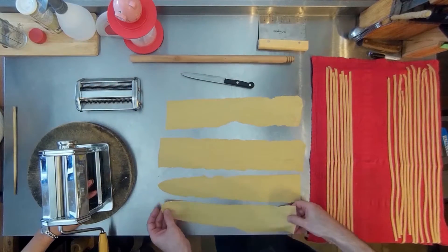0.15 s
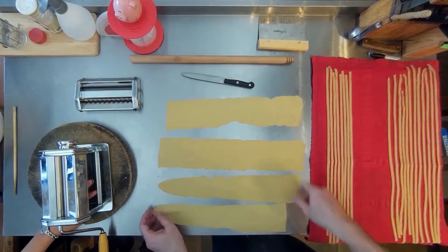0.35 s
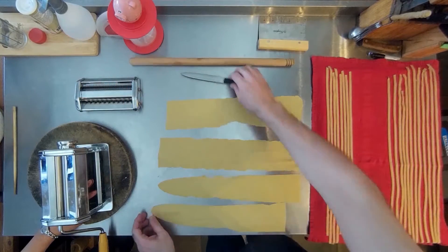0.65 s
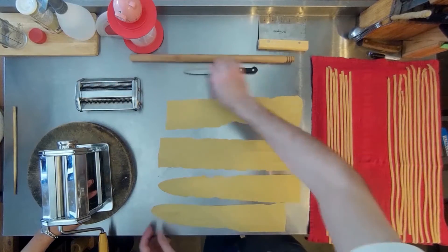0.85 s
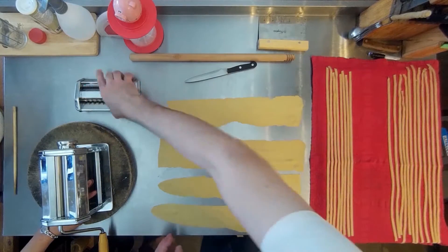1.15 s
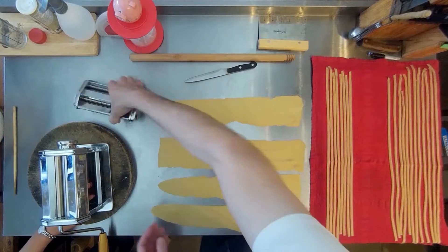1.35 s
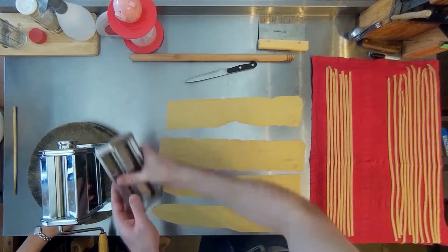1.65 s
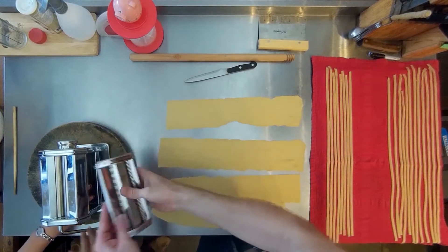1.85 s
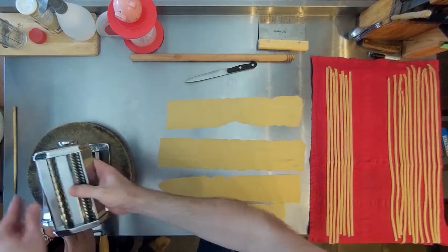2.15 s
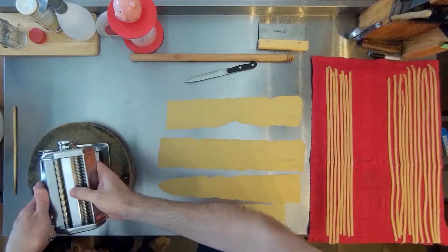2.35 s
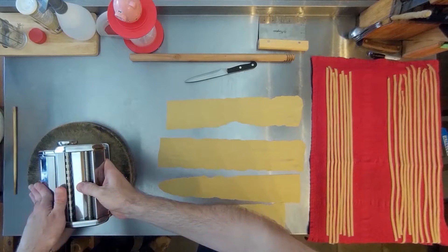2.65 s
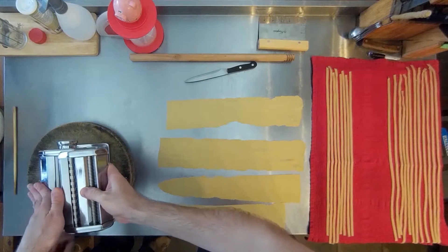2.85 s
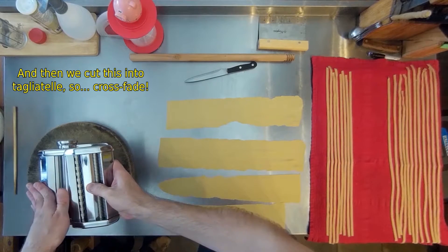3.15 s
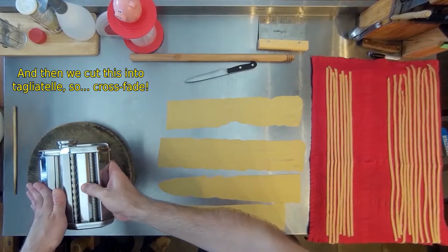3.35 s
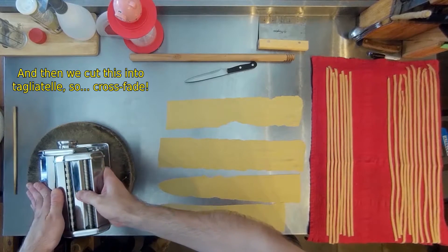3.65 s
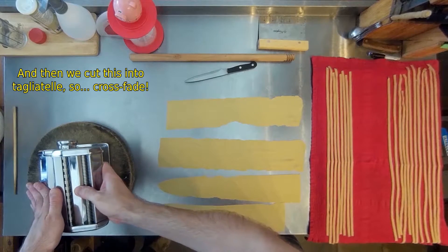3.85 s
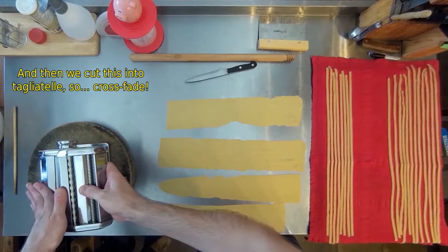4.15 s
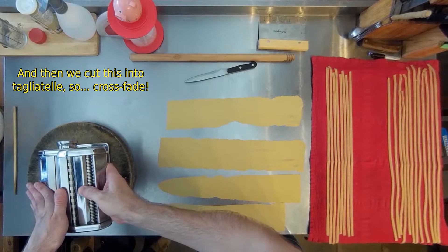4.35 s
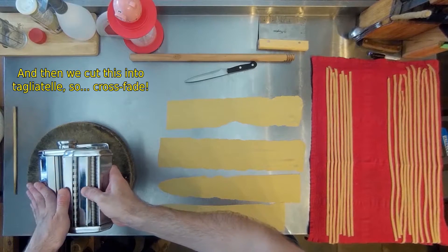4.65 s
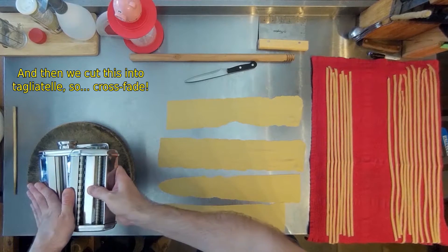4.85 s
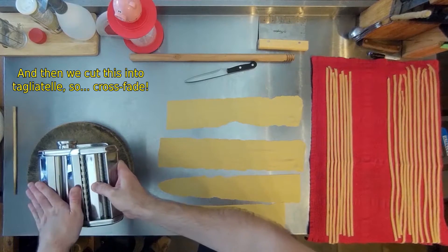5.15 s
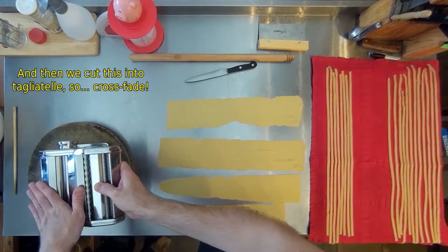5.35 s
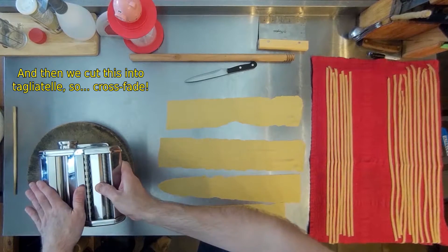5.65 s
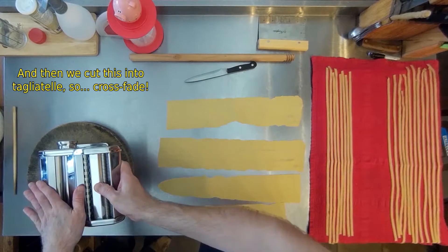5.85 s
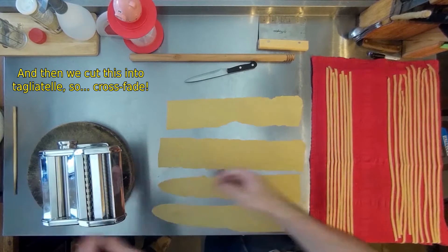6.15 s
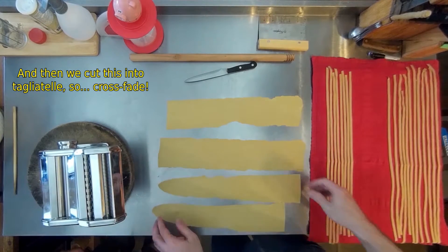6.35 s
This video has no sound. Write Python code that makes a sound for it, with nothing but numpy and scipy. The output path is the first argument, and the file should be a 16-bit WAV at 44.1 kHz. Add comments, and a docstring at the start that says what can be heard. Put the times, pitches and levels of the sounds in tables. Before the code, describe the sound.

A faint, steady low background fills a reflective kitchen. At 0.45 s there is a barely audible hand pat. Around 0.95 s a loose steel cutter clinks twice on the metal worktop, with a thin lingering ring and slight scrape; at 1.3 s a hollow sheet-metal thud follows. Tiny tinkles sound from 1.4 to 2.2 s as it is carried. At 2.3 s it scrapes against the pasta machine, then hard knocks hit at 2.6 and 2.75 s. From 2.9 to 3.25 s and 3.6 to 4.35 s come dense, short-damped clanks, rattles and grinding, with the table rumbling beneath. It eases; a quiet mid-pitched creak swells from 4.5 s and stops near 5 s amid small clicks. Knocks and scraping return at 5.25-5.5 s, a light tinkle at 5.6 s, then two loud, dry hand slaps at 5.8 and 6.05 s, leaving brief echo and background.

```python
"""In a hard-walled kitchen, a steel cutter head is nudged on a metal worktop, picked up and worked onto
the frame of a hand-cranked pasta machine. Parts knock, grind and tinkle, hands slap, the worktop shakes, a creak
swells; the room echoes the blows over a faint steady background. Micro-impact bursts and friction noise drive
banks of damped sines; slaps, shaking, echoes and background are shaped noise.
"""
import sys
import numpy as np
from scipy import signal
from scipy.fft import rfft, irfft
from scipy.io import wavfile
from scipy.ndimage import uniform_filter1d

SR = 44100
rng = np.random.default_rng(int(sys.argv[2]) if len(sys.argv) > 2 else 0)


def store_pcm(level_fs):
    """Save levels as 16-bit WAV."""
    pcm = np.round(np.clip(level_fs, -1, 1) * 32767).astype(np.int16)
    wavfile.write(sys.argv[1], SR, np.atleast_2d(pcm).T)


N = 286650   # samples
CURVE_STEP = 32   # samples per point of a coarse curve


def from_db(db):
    """Decibels to amplitude gain."""
    return 10 ** (np.asarray(db) / 20)


def rms_one(x):
    """Scale to rms 1."""
    return x / np.sqrt(np.mean(x ** 2) + 1e-20)


def at_hz(points, hz, column=1):
    """Read a table column, linear in log frequency."""
    points = np.array(points)
    return np.interp(np.log(hz), np.log(points[:, 0]), points[:, column])


def coloured(spectrum):
    """Gaussian noise filtered to the given spectrum, rms 1."""
    hz = np.maximum(np.arange(N // 2 + 1) * SR / N, 1)
    white = rfft(rng.standard_normal(N))
    return rms_one(irfft(white * from_db(at_hz(spectrum, hz)), N))


def swells(start_s, rise_s, peak_db, rise_db, fade_s):
    """One coarse gain curve per event: sets in, climbs to its peak, fades evenly in dB (fade_s per 20 dB)."""
    past_peak_s = np.arange(0, N, CURVE_STEP) / SR - (start_s + rise_s)[:, None]
    rise_s, fade_s = (np.maximum(v + 0 * start_s, .002)[:, None] for v in (rise_s, fade_s))
    climb_db = rise_db * past_peak_s / rise_s
    fall_db = -20 * past_peak_s / fade_s
    db = peak_db[:, None] + np.minimum(climb_db, fall_db)
    return from_db(db) * (past_peak_s > -rise_s)


def full_rate(curve):
    """Smooth a coarse curve and interpolate it to every sample."""
    smooth = uniform_filter1d(curve, size=9)
    return np.interp(np.arange(N) / CURVE_STEP, np.arange(len(curve)), smooth)


RISE_MS = 1.2   # slope of the contact's onset, which starts at a quarter of full height


def chatter(length_ms):
    """A contact is a dying flurry of micro-impacts that drives all pitches about equally; unit energy."""
    t_ms = np.arange(2048) * 1000 / SR
    fall = np.exp(-t_ms / np.clip(length_ms, .2, 20)[:, None])
    flurry = rng.standard_normal(fall.shape) * fall
    flurry *= np.minimum(t_ms / RISE_MS + .25, 1)
    for _ in range(3):   # flatten the spectrum, then restore some of the decay
        spectrum = rfft(flurry)
        flat = irfft(spectrum / (np.abs(spectrum) + 1e-9))
        flurry = flat * fall ** 0.22
    return flurry / np.sqrt(np.sum(flurry ** 2, axis=1, keepdims=True))


def ring(x, hz, t60_s):
    """Two-pole resonator: a unit click starts a damped sine of about unit height."""
    r = from_db(-60 / (t60_s * SR))
    w = 2 * np.pi * hz / SR
    return signal.lfilter([0, np.sin(w)], [1, -2 * r * np.cos(w), r * r], x + 1e-18)


LOW_RING_HZ = 1340   # low_db acts on modes below this


def strike(t_s, level_db, tilt_db, length_ms, modes, pivot_hz, trim_db, spread_db,
           low_db=0, rub=0, rub_tilt_db=0):
    """Each blow drives every mode with its own random strength; rubbing drives them continuously."""
    luck = rng.standard_normal((len(t_s), len(modes)))
    contact = chatter(length_ms)
    at = np.round(t_s * SR).astype(int)[:, None] + np.arange(contact.shape[1])
    out = np.zeros(N)
    for k, (hz, mode_db, t60_s) in enumerate(modes):
        octaves = max(np.log2(hz / pivot_hz), 0)   # brightness acts above the pivot only
        blow_db = level_db + trim_db + tilt_db * octaves
        blow_db = blow_db + low_db * (hz < LOW_RING_HZ) + spread_db * luck[:, k]
        pulses = from_db(blow_db)[:, None] * contact
        drive = np.bincount(at.ravel(), pulses.ravel(), N)
        drive = drive + rub * from_db(rub_tilt_db * octaves)
        out += (-1) ** k * from_db(mode_db) * ring(drive, hz, t60_s)
    return out


# background spectrum: f/Hz, relative level/dB per Hz
BACKGROUND_SPECTRUM = [(9.4, -32), (16, 3.5), (64, -7), (574, -7.5), (1170, -17.5), (1450, -15.5),
                       (1580, -17.5), (2310, -22), (6360, -29), (9070, -39), (11000, -59), (14300, -83),
                       (22000, -120)]
BACKGROUND_RMS_DB = -61


def background():
    """Steady coloured noise."""
    return from_db(BACKGROUND_RMS_DB) * coloured(BACKGROUND_SPECTRUM)


# hands pat or slap dough, worktop and frame: t/s, level/dB, centre f/Hz, width/octaves
SLAPS = [(.45, -43.5, 1470, 2.5), (1.54, -46, 2500, 3), (5.606, -39.5, 3480, 1.8), (5.815, -16, 2000, 1.81),
         (6.048, -14, 1500, 1.47)]
SLAP_MS, RUSTLE_DB, RUSTLE_T60_S = 1.6, -11.5, 0.23   # rustle rms re clack peak, before the band filter


def slaps():
    """Ringless clack: a short flurry plus dying rustle noise through one broad band."""
    out = np.zeros(N + SR)
    contact = chatter(np.full(len(SLAPS), SLAP_MS))
    t = np.arange(SR // 2) / SR
    for (t_s, level_db, hz, octaves), flurry in zip(SLAPS, contact):
        clack = rng.standard_normal(len(t)) * from_db(RUSTLE_DB - 60 * t / RUSTLE_T60_S)
        clack[:len(flurry)] += flurry / np.abs(flurry).max()
        edges_hz = hz * 2 ** (np.array([-.5, .5]) * octaves)
        band = signal.butter(3, edges_hz, "band", fs=SR, output="sos")
        out[round(t_s * SR):][:len(t)] += from_db(level_db) * signal.sosfilt(band, clack)
    return out[:N]


# steel sliding on steel: start t/s, swell/s, peak force level/dB, fade/s per 20 dB, brightness/dB per octave
SLIDES = [(0.859, 0.066, -68.5, 0.2231, 7.5), (1.389, 0.0072, -76.5, 0.24, 4.5),
          (2.316, 0.028, -54.5, 0.1153, 2.5), (2.33, 0.039, -53.5, 0.07, 7.5),
          (2.5, 0.096, -73, 1.21, 10.5), (2.85, 0.15, -60, 0.21, 2), (3.259, 0.022, -72, 1.04, -1),
          (3.8, 0.013, -64, -0.02, 8), (4.9, 0.0044, -75.5, 0.19, 6), (5.223, 0.021, -60, 0.2428, 4.5),
          (5.255, 0.0067, -96, .5, 27), (5.49, 0.0089, -83.5, 1, 4)]
SLIDE_RISE_DB, GRAINS_PER_S = 15, 2500


def grinding():
    """Random signed friction grains scaled by slide force; the strongest slide sets brightness."""
    start_s, swell_s, peak_db, fade_s, tilt_db = np.transpose(SLIDES)
    force = swells(start_s, swell_s, peak_db, SLIDE_RISE_DB, fade_s)
    height = from_db(4.68 * np.minimum(rng.exponential(1, N), 4))
    grains = (rng.random(N) < GRAINS_PER_S / SR) * height * rng.choice([-1, 1], N)
    rub = rms_one(grains) * full_rate(force.sum(axis=0))
    return rub, full_rate(tilt_db[force.argmax(axis=0)])


# cutter against frame: t/s, level/dB, brightness/dB per octave, chatter/ms, low-ring level/dB
KNOCKS = [(2.352, -21, -6, 2.2, 4), (2.599, 0, 2.5, 1.8, 1), (2.695, -8, 3, 4.4, 4),
          (2.746, 1, -0.5, 3, -1.5), (2.76, -21, -16, 2.5, 3), (2.929, -18.5, -8, 2, -2),
          (2.985, -6, 1, 4.1, 3.5), (3.011, -4, -5.5, 3.1, 2), (3.023, -7.5, 1.5, 5.1, 2),
          (3.049, -12.5, -3, 2.3, 1.5), (3.059, -14.5, -6.5, 2.5, -3), (3.166, -26.5, 9, 24, 8.5),
          (3.181, -9.5, -2.5, 3.5, 0.5), (3.245, -9, 0, 5.5, -2.5), (3.5, -32.5, -6, 11, -1.5),
          (3.569, -20.5, 0, 14, -7), (3.59, -17, -0.5, 1.5, 3.5), (3.632, -3.5, -4.5, 3.3, 2),
          (3.648, -18.5, 2, 4, 1), (3.688, -6, 1, 3, 1), (3.718, -2, 0, 12, -2.5),
          (3.734, -15, -12, 2.4, 4.5), (3.774, -12, 0.5, 2.8, 0), (3.794, -1.5, 1.5, 4.8, -4.5),
          (3.932, -11, -1, 8.3, -3), (4.045, -13, -1, 5.1, 4.5), (4.097, -4.5, -1, 3.3, -3.5),
          (4.239, -6.5, -8.5, 7.7, -4.5), (4.321, -24, 0, 9.2, 1), (4.346, -12, -3, 11.6, 0.5),
          (4.408, -30, 2, 6, 6.5), (4.661, -26.5, -9, 8.9, -9), (4.817, -29, -1.5, 12, -1.5),
          (4.832, -18.5, -2, 13.3, -1), (4.878, -23, -3.5, 2.2, -8), (4.903, -19, -1.5, 1.5, -11),
          (4.979, -22.5, 6, 1.7, -1.5), (5.251, -7.5, -4, 4.6, -1.5), (5.273, -12.5, 3, 2.4, -2.5),
          (5.314, -16, -6, 3.2, -3), (5.467, -12, -0.5, 10, -4)]
# modes of frame and cutter together, hand-damped; shortest rows are dense clusters of panel modes:
# f/Hz, level/dB, t60/s
FRAME_MODES = [(337, -36.5, 0.037), (548, -21.5, 0.08), (588, -27, 0.062), (900.6, -10, 0.067),
               (955, -17.5, 0.035), (998, -4, 0.054), (1126, -5, 0.083), (1160, -3.5, 0.061),
               (1201.5, 3.5, 0.027), (1294, -3.5, 0.029), (1401, -4, 0.028), (1501, -8.5, 0.081),
               (1600, -3.5, 0.027), (1759, -1, 0.014), (1966, -7, 0.022), (2109, -9.5, 0.028),
               (2400, -3, 0.011), (2514, -16, 0.061), (2501, -8, 0.038), (2860, -2.5, 0.0076),
               (3040, -7.5, 0.019), (3330, -3.5, 0.0039), (3323, -21, 0.068), (3852, -15, 0.015),
               (4220, -7, 0.007), (4710, -24.5, 0.02), (5312, -29.5, 0.064), (5140, -4.5, 0.0018),
               (6150, -25, 0.033), (6200, -18, 0.004), (7190, -26.5, 0.013), (8770, -38, 0.017),
               (9560, -31.5, 0.00091)]


def machine():
    """Knocks and grinding grains ring the same frame."""
    *blows, low_db = np.transpose(KNOCKS)
    rub, rub_tilt_db = grinding()
    return strike(*blows, FRAME_MODES, pivot_hz=1290, trim_db=-9.0, spread_db=4.0,
                  low_db=low_db, rub=rub, rub_tilt_db=rub_tilt_db)


# free cutter struck on the worktop: t/s, level/dB, brightness/dB per octave, chatter/ms
BUMPS = [(0.9591, -9.5, 0, 1.37), (0.976, -9, -8.5, 0.84), (1.002, -20.5, 0, 1.2),
         (1.2742, -26.5, -21.5, 3.7)]
# modes of the free cutter; shortest rows are dense clusters: f/Hz, level/dB, t60/s
CUTTER_MODES = [(340, -19, 0.038), (990, -5.5, 0.049), (1420, -4.5, 0.013), (1770, -18, 0.15),
                (2325, 0, 0.003), (2793, 5.5, 0.039), (931, -12, .36), (2745, -20, .5), (2768, -17, .6),
                (2790, -17, .5), (3900, -22, .45), (3948, -22, .3), (5100, -36, .28), (6440, -39, .45),
                (7810, -49, .35), (8190, -49, .35), (9560, -51, .4), (3010, -12, 0.189),
                (3090, -17.5, 0.28), (3262, -11, 0.057), (3800, 1, 0.02), (3600, -27.5, 0.23),
                (5000, -18, 0.0065), (6900, -19, 0.023), (7800, -27, 0.0036)]


def cutter():
    """The loose cutter rings long when struck."""
    return strike(*np.transpose(BUMPS), CUTTER_MODES, pivot_hz=1650, trim_db=-1.0, spread_db=2)


# pushes of the hands that jolt the worktop: peak t/s, level/dB, extra level below the split/dB
JOLTS = [(1.148, -44.5, -12), (1.305, -27.5, -9), (2.337, -37, 8.5), (2.438, -50.5, 18), (2.612, -31, 3),
         (2.7, -36.5, 11), (2.756, -31, -9), (2.939, -44.5, 2), (3.007, -29, -11), (3.051, -33.5, -15),
         (3.185, -37.5, 6), (3.259, -33, -0.5), (3.371, -39, -2.5), (3.585, -33.5, -7), (3.64, -33.5, 4),
         (3.713, -32, 8), (3.749, -32.5, 0), (3.837, -32, 3.5), (3.94, -35.5, -16), (4.055, -39.5, -12),
         (4.105, -40.5, -9), (4.245, -47.5, -9.5), (4.357, -43.5, 11), (4.839, -48.5, 21), (4.91, -42.5, 5),
         (4.988, -46.5, 15.5), (5.273, -29.5, 7), (5.324, -31, 11.5), (5.41, -36.5, -5.5),
         (5.486, -33, 7.5)]
# worktop shaking spectrum: f/Hz, relative level/dB per Hz
WORKTOP_SPECTRUM = [(8.2, -31.5), (14, -4), (49, -8.5), (65, 7), (82, -15.5), (112, 3.5), (135, -4.5),
                    (195, 1), (234, 0), (270, -16.5), (316, -11), (354, -26), (402, -19), (420, -21),
                    (550, -43), (920, -120)]
JOLT_RISE_S, JOLT_RISE_DB, JOLT_FADE_S = 0.04, 31, 0.08   # fade per 20 dB
SPLIT_HZ = 64   # below: whole worktop sways; above: sheet shudders


def worktop_shaking():
    """Each push swells the same coloured noise, with its own balance of sway and shudder."""
    t_s, level_db, sway_db = np.transpose(JOLTS)
    shake = swells(t_s - JOLT_RISE_S, JOLT_RISE_S, level_db, JOLT_RISE_DB, JOLT_FADE_S)
    noise = coloured(WORKTOP_SPECTRUM)
    sway = signal.sosfiltfilt(signal.butter(2, SPLIT_HZ, fs=SR, output="sos"), noise)
    shudder = noise - sway
    return full_rate(shake.sum(axis=0)) * shudder + full_rate(from_db(sway_db) @ shake) * sway


# small touches, loose steel parts: t/s, level/dB, t60/s, pitch f/Hz, brightness/dB per octave
TINKLES = [ (1.274, -36.5, 0.15, 1765, -21), (1.415, -51, 0.069, 1416, -6.5),
           (1.519, -44.5, 0.038, 1807, -8), (1.836, -55.5, 0.1, 2445, -9), (1.842, -60, 0.18, 3060, -9),
           (1.943, -41.5, 0.046, 2155, -7), (1.946, -43, 0.043, 2676, -17),
           (2.144, -34.5, 0.075, 1542, -12.5), (2.162, -44, 0.04, 1510, -14), (2.205, -56, 0.08, 2380, 1),
           (3.419, -43.5, 0.15, 2507, -21.5), (3.423, -47, 0.18, 2570, -22.5), (5.609, -42, 0.2, 2030, -22),
           (5.611, -42, 0.3, 2170, -22), (5.612, -52, 0.3, 5320, -28.5), (6.054, -40.5, 0.13, 463, -2)]
# partials shared by all small parts: multiple of the pitch, level/dB
PARTIALS = [(1.0, 1), (2.089, 3.5), (3.131, -4.5), (4.4, -19)]


def tinkles():
    """Light touches ring small parts with one partial pattern at many pitches; high partials die sooner."""
    out = np.zeros(N)
    for t_s, level_db, t60_s, pitch_hz, tilt_db in TINKLES:
        modes = [(min(pitch_hz * k, 12000), partial_db, t60_s / np.sqrt(k)) for k, partial_db in PARTIALS]
        out += strike(np.array([t_s]), level_db, tilt_db, np.array([3.5]), modes,
                      pivot_hz=pitch_hz, trim_db=-0.5, spread_db=4.0)
    return out


# hollow thuds of the worktop sheet: t/s, level/dB, chatter/ms
THUDS = [(1.298, -22, 3.9), (1.3087, -10, 1.37)]
# modes of the worktop sheet: f/Hz, level/dB, t60/s
SHEET_MODES = [(167, -11.5, 0.047), (256, 1.5, 0.038), (328, -1.5, 0.11), (450, -0.5, 0.019),
               (526, -8, 0.21), (702, -12, 0.05)]


def worktop_thuds():
    """The worktop sheet booms in its low modes."""
    t_s, level_db, length_ms = np.transpose(THUDS)
    return strike(t_s, level_db, 0, length_ms, SHEET_MODES, pivot_hz=330, trim_db=-6.0, spread_db=3.0)


# seated cutter creaks: start t/s, swell/s, peak rms level/dB, fade/s per 20 dB, f/Hz, t60/s
CREAK = (4.5, 0.48, -52.5, 0, 1035, 0.2)


def creak():
    """Fine friction noise keeps one resonance singing; it swells, then stops short."""
    start_s, swell_s, level_db, fade_s, hz, t60_s = np.array(CREAK)[:, None]
    tone = rms_one(ring(rng.standard_normal(N), hz[0], t60_s[0]))
    return tone * full_rate(swells(start_s, swell_s, level_db, 3, fade_s)[0])


# room echo: f/Hz, t60/s, relative level/dB
KITCHEN_ECHO = [(97.3, 0.11, -0.5), (496, 0.63, -1), (1180, 0.37, 2), (2880, 0.34, 4.5), (8000, 0.3, 7.5)]
KITCHEN_TRIM_DB, FIRST_ECHO_S = -34.5, 0.0012


def kitchen(x):
    """Dense echoes: convolution with octave-band noise, each band decaying at its own rate."""
    t = np.arange(SR // 2) / SR
    edges_hz = 50 * 2. ** np.arange(9)
    tail = np.zeros(len(t))
    for low, high in zip(edges_hz, edges_hz[1:]):
        sos = signal.butter(2, [low, high], "band", fs=SR, output="sos")
        band = signal.sosfilt(sos, rng.standard_normal(len(t)))
        hz = np.sqrt(low * high)
        decay_db = at_hz(KITCHEN_ECHO, hz, column=2) - 60 * t / at_hz(KITCHEN_ECHO, hz)
        tail += band * from_db(decay_db)
    tail *= np.clip(t / FIRST_ECHO_S - 1, 0, 1)   # silent until the first echo, then ramps in
    return from_db(KITCHEN_TRIM_DB) * signal.fftconvolve(x, tail)[:N]


def scene():
    """Sum blows and friction, their echoes, the shaking worktop and the background."""
    blows = slaps() + machine() + cutter() + tinkles() + worktop_thuds() + creak()
    return (background() + blows + kitchen(blows) + worktop_shaking())[None]


CEILING, CUTOFF_HZ = .62, 11400   # soft limit re full scale; stopband edge


def record(dry):
    """Roll off the treble, round peaks by tanh, cut the top steeply."""
    dull = signal.sosfilt(signal.butter(2, 8500, fs=SR, output="sos"), dry)
    rounded = CEILING * np.tanh(dull / CEILING)
    return signal.sosfilt(signal.cheby2(10, 50, CUTOFF_HZ, fs=SR, output="sos"), rounded)


dry = scene()
out = record(dry)
store_pcm(out)
```